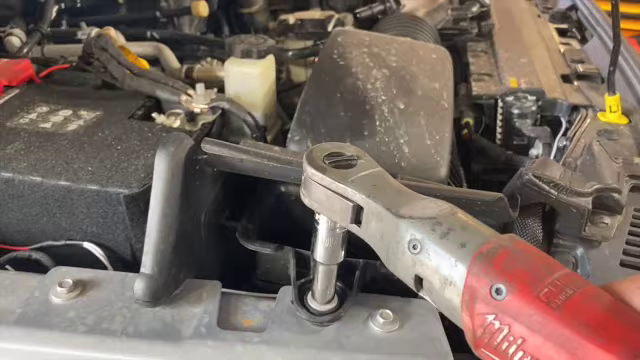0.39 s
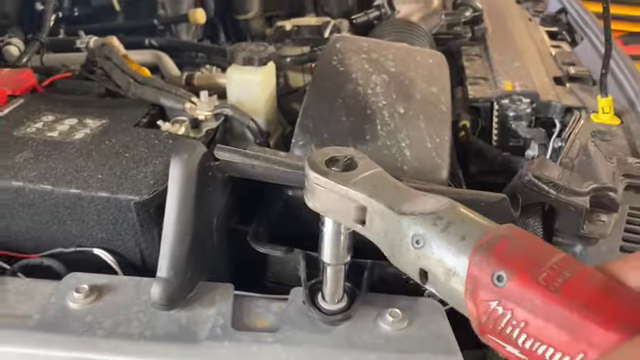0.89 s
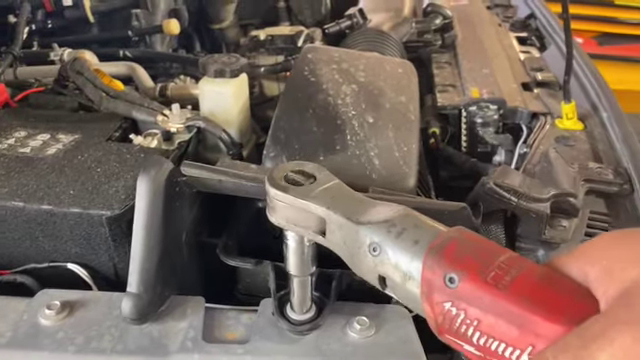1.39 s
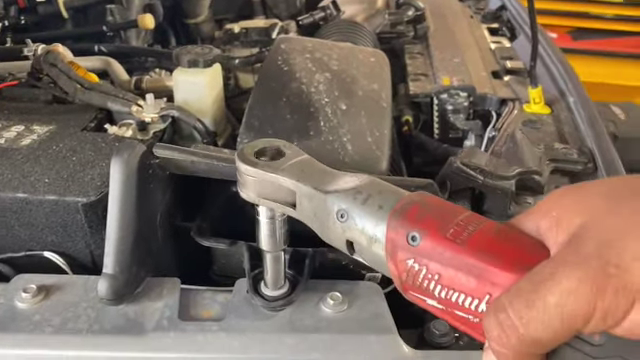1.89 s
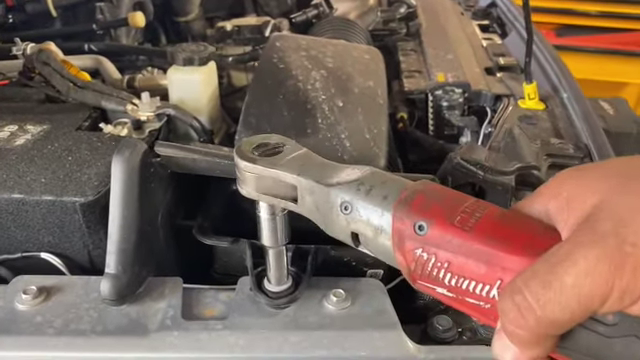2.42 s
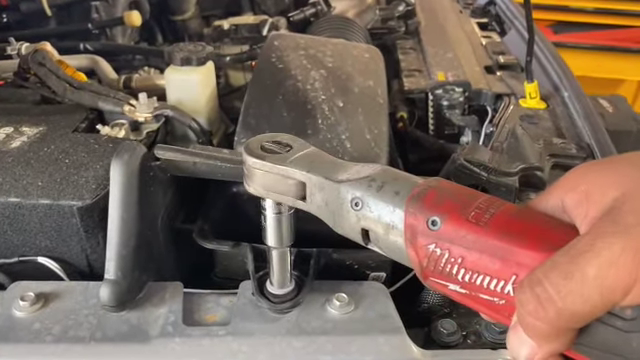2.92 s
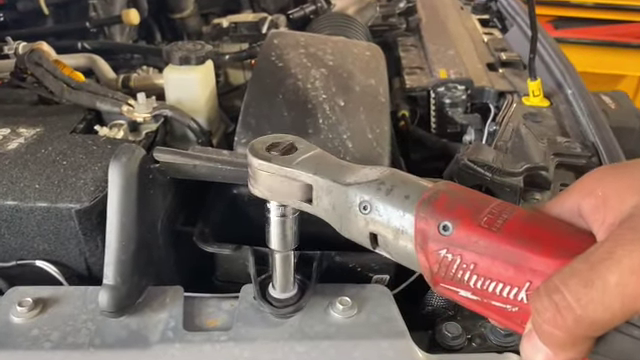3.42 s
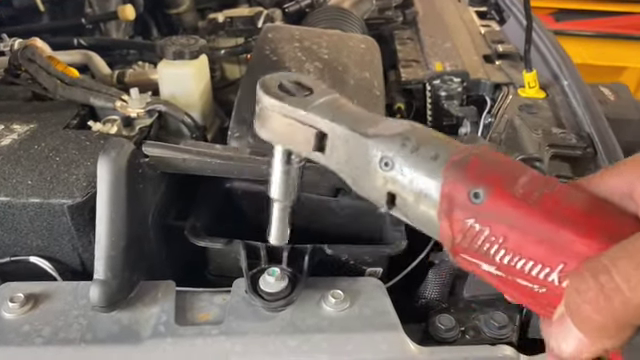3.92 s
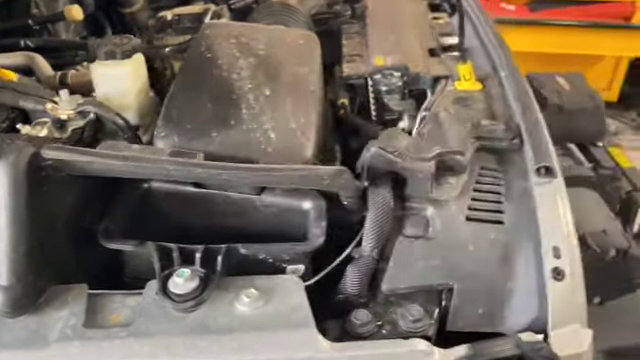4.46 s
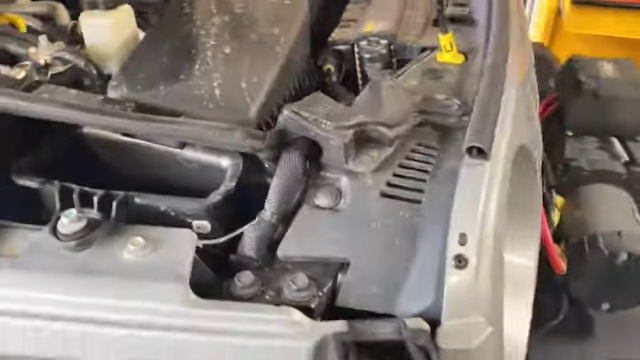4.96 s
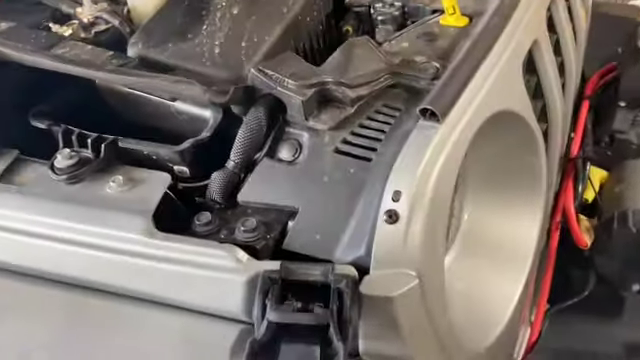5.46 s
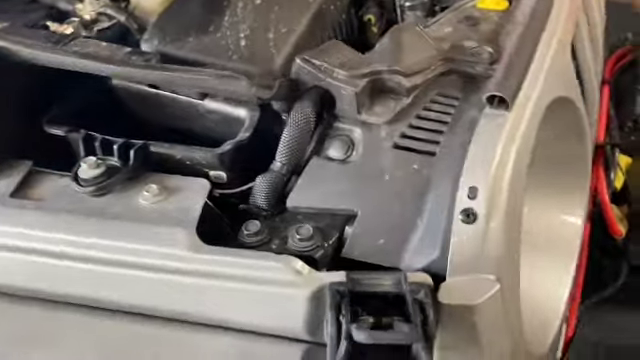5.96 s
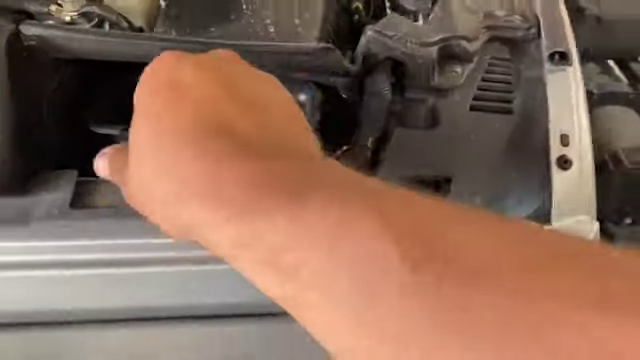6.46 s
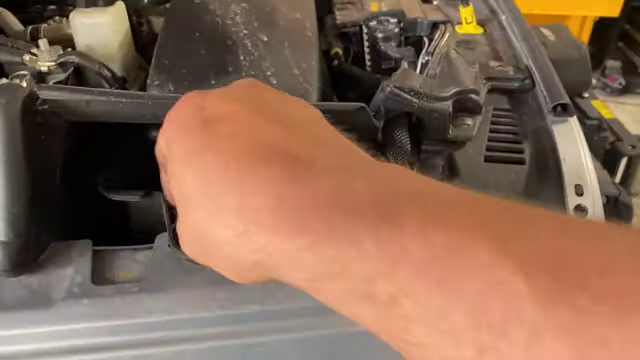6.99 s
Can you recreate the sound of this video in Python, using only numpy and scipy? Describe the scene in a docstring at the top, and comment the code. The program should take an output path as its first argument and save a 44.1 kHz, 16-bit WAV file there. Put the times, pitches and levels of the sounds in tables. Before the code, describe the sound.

A loud geared motor dominates the first four seconds, heard in stereo very near the microphone: fast metallic chatter, high steel snaps, thin whine and bolt knocks that soften as the thread loosens. After an abrupt stop, only soft shop air remains. A metal plate clanks and bounces in the reverberant shop; later a hand rustles and taps and a plastic part snaps.

```python
"""Small taps of hand and trigger open the scene in a workshop, close to a two-port microphone.
A cordless ratchet then backs a bolt out of an engine bay: a geared motor turns a crank, and every turn
rocks the yoke, snaps the pawl over its teeth and knocks the bolt, while gain control pulls the level down.
After the stop a metal plate clanks and rings in the shop; a hand rustles and taps, and a plastic part clicks.
Shop air hums throughout, filtered from noise; struck parts are sums of decaying modes."""
import sys
import numpy as np
from scipy import signal
from scipy.fft import rfft, irfft, next_fast_len
from scipy.io import wavfile
from scipy.ndimage import uniform_filter1d

SR = 44100
rng = np.random.default_rng(int(sys.argv[2]) if len(sys.argv) > 2 else 0)


def pcm_store(signal):
    """Save signal as 16-bit PCM."""
    levels = np.round(np.clip(np.atleast_2d(signal), -1, 1) * 32767)
    wavfile.write(sys.argv[1], SR, levels.astype(np.int16).T)


def natural_amplitude(level_db):
    """Convert a level in decibels to a linear amplitude factor, elementwise."""
    exponent = np.asarray(level_db, float) / 20
    return 10 ** exponent


N = 313452
T = np.arange(N) / SR
PADDED = next_fast_len(N)
HZ = np.fft.rfftfreq(PADDED, 1 / SR)

# Levels in the tables are relative: gains further on act on them.
# Spectrum of the shop air: [hz, level_db per Hz]
AIR_SPECTRUM = [(12, -43), (20, -11.5), (85, 1), (190, -11.5), (250, -3), (285, -12.5), (337, -10),
                (420, -17), (725, -23.5), (1200, -24.5), (1900, -32.5), (4000, -40.5), (14000, -65)]
# Strokes of hand and cloth: [middle_s, length_s, level_db]
RUSTLE_STROKES = [(.2, 1, -83), (5.08, .16, -75), (5.35, 0.46, -76), (5.6, 1, -76), (6.55, 0.28, -74),
                  (6.865, 0.091, -72), (6.925, 0.042, -78.5), (6.98, .05, -71), (7.0, 0.51, -74)]
# Spectrum of rubbed cloth: [hz, level_db per Hz]
CLOTH_SPECTRUM = [(400, -3.5), (900, 0), (1800, 1), (2800, 1), (4000, -7.5), (7500, -7), (11000, -14),
                  (14000, -21.5)]
# Small taps of hand, trigger and metal: [start_s, level_db, centre_hz, t60_s, shop_echo_db]
SMALL_TAPS = [(0.176, -52, 9250, 0.027, -1), (0.32, -55.5, 2790, 0.017, -10),
              (0.37, -49.5, 2670, 0.012, -5.5), (5.351, -56, 1300, 0.01, 14),
              (5.351, -47, 12800, 0.026, 13), (5.486, -44, 12000, .012, -3), (5.486, -43, 6240, 0.021, 1),
              (6.407, -57, 1620, 0.025, -3), (6.411, -64.5, 5000, .02, 0), (6.606, -58, 3490, 0.024, 8.5),
              (6.697, -58, 5800, 0.016, -3), (6.81, -56, 1200, 0.026, -2.5), (6.864, -62.5, 5030, .04, 4),
              (6.852, -57, 780, 0.047, -2), (6.869, -54, 600, 0.026, 6), (6.885, -65, 3400, 0.046, 3),
              (6.922, -51.5, 1500, 0.04, -4), (6.926, -50, 545, .04, -1), (6.958, -53, 1830, 0.058, -6),
              (6.9215, -56, 5200, 0.054, -7.5), (6.972, -48, 2200, 0.056, 5), (6.973, -47, 4320, 0.039, 2),
              (6.975, -50, 1110, .04, -2)]
# Modes of a small plastic part: [hz, width_hz, level_db]
PLASTIC_MODES = [(1620, 99, -15), (2280, 130, -4), (3660, 440, -1), (3900, 30, -12), (4000, 150, -12),
                 (4850, 370, -5.5), (5500, 460, -3.5), (7700, 2400, -6)]
# Hits on the plastic part: [start_s, level_db]
PLASTIC_HITS = [(6.7423, -39), (6.7437, -26.5), (6.7468, -31), (6.782, -58), (6.8112, -55), (6.818, -55)]
# Modes of a metal plate: [hz, width_hz, level_db]
PLATE_MODES = [(1534, 140, -23), (2790, 99, 3), (3200, 360, -6), (4320, 180, -8), (5950, 400, -10),
               (7100, 500, -1), (8000, 290, 11), (8340, 350, -6)]
# The plate lands and bounces: [start_s, level_db]
PLATE_LANDINGS = [(5.3525, -27.5), (5.364, -45), (5.372, -42), (5.385, -48), (5.4, -55), (5.428, -62)]
# Decay of the shop echo: [hz, t60_s]
SHOP_DECAY = [(500, .3), (1300, .45), (3500, .38), (9000, .35), (11000, .33), (14000, .2)]
# How well the tool's sound escapes the bay: [hz, level_db]
BAY_ESCAPE = [(500, -17.5), (3000, -16), (4800, -22), (6500, -13.5), (8700, -22.5), (10300, -17.5),
              (13500, -22)]

# Motor shaft: [time_s, speed_turns_per_s]
SHAFT_SPEED = [(.41, 120), (.44, 300), (.5, 345), (.56, 369), (.62, 380), (.76, 382), (1., 386),
               (1.3, 387.3), (1.9, 388.3), (2.5, 388.3), (3.1, 388), (3.76, 387.3), (3.8, 368), (3.85, 338),
               (3.9, 297), (3.94, 258)]
# Running tool: [time_s, drive_db against free running, bite_db of the thread as the bolt comes loose]
TOOL_LOAD = [(0.413, -20.5, -2.5), (0.426, -19.5, -11.5), (0.439, -2, 10), (0.545, -2.5, 11),
             (0.63, -3, 11.5), (0.739, -1.5, 10.5), (0.9, 0, 5), (1.1, -0.1, 7), (1.5, 0.27, 4),
             (1.85, 0.5, -0.5), (1.93, 0.36, 4), (2.4, 0.3, -5.5), (3., 0.3, -10.5), (3.3, 0.3, -10),
             (3.55, 0.17, -25), (3.8, -0.2, -30), (3.88, -5.5, -21), (3.94, -3.5, -15)]
# Contacts in one crank turn: [place_turns, decay_turns, rattle_db, pawl_db]
CRANK_CONTACTS = [(-.22, .2, -22, -5), (-.07, .08, -6, -6), (0, .03, -14, -8), (.22, .12, -3, -11),
                  (.45, .07, -4, -26)]
# The gripping hand rumbles: [middle_s, length_s, level_db]
HAND_RUMBLES = [(.5, 0.14, -33), (.7, 0.2, -44), (1.07, 0.24, -52.5), (1.74, 0.11, -56), (2.46, .14, -50.5),
                (2.7, 0.25, -50), (2.89, 0.18, -43), (3.12, 0.41, -41), (3.41, 0.46, -33.5),
                (3.68, 0.33, -41)]
# Chirps of the motor at grip and stall: [start_s, level_db, first_hz, last_hz, length_s, shape_exponent]
MOTOR_CHIRPS = [(.4115, -26, 4090, 4030, .008, .5), (3.9165, -35, 1090, 520, .02, .85)]
# Tonal lines of the motor: [multiple_of_shaft_speed, level_db]
SHAFT_ORDERS = [(1, 0), (2, -9), (4, -0.5), (5, -15), (6, -11), (8, -2), (10, -17.5), (12, -2), (13, 1),
                (16, -8.5)]
# Sway of the yoke: [multiple_of_crank_speed, level_db]
YOKE_ORDERS = [(1, -8), (2, -2), (3, -6.5), (4, -4), (5, -0.5), (6, 1), (9, 0), (10, 1.5), (11, 2),
               (13, 4.5), (14, 0)]
# Gears heard through the housing: [hz, level_db per Hz]
GEAR_SPECTRUM = [(120, -30), (500, -16), (1000, -12), (1300, -16), (1560, -6), (1900, -8.5), (2400, -4),
                 (3000, -3.5), (3700, -5.5), (4300, -4.5), (5200, -3), (5700, -5.5), (6300, -4),
                 (7200, -0.5), (8600, 1.5), (12000, -3), (14300, -13), (15300, -6)]
# Gear-case resonance as the tool tilts: [time_s, centre_hz]
CASE_GLIDE = [(.4, 4500), (.8, 5000), (1.3, 5200), (2.6, 5250), (3.9, 5180)]
# Second gear-case resonance, one row: [centre_hz, width_hz, share]
CASE_FIXED = (4300, 370, 0.75)
# Hard knocks as the tight bolt breaks free: [start_s, level_db]
BREAKING_BLOWS = [(0.44, -20), (0.475, -13.5), (0.496, -5.5), (.516, -16), (0.537, -11.5), (.547, -12),
                  (0.556, -12), (.577, -16.5), (.595, -12.5), (.613, -16), (.633, -10.5), (.651, -15.5),
                  (.67, -14.5), (.689, -15), (.709, -14.5), (.727, -15), (.746, -23), (.764, -7),
                  (.784, -18.5), (.82, -22), (.839, -24)]
# The knock shifts as the load changes: [time_s, place_turns of the crank]
KNOCK_PLACE = [(.75, 0.35), (1., 0.13), (1.8, 0.16), (2., 0.27), (3.9, 0.24)]
# Modes of the bracket round the bolt: [hz, width_hz, level_db]
BRACKET_MODES = [(203, 35, -12), (726, 24, -4), (928, 110, 2), (1007, 240, 2), (1393, 130, 1.5),
                 (1460, 63, -0.5), (2034, 110, -1), (2300, 50, 0), (2680, 100, 3.5)]
# Modes of a wide panel: [hz, width_hz, level_db]
PANEL_MODES = [(102, 76, -11.5), (193.4, 57, -3.5), (275, 19, -14.5), (319.7, 46, -1), (466, 240, 9),
               (642, 100, 7)]
# Modes of the bolt: [hz, width_hz, level_db]
BOLT_MODES = [(992.3, 60, 1.5), (1019, 120, -0.5)]
# The loose bolt jangles in its bracket: [middle_s, length_s, level_db]
BOLT_JANGLES = [(.54, 0.11, -33.5), (.68, 0.2, -45.5), (.96, 0.098, -39), (1.1, 0.21, -44.5),
                (1.37, 0.54, -53.5), (1.62, 0.41, -52), (1.78, .1, -52), (1.93, 0.19, -39.5),
                (2.03, 0.32, -44.5), (2.23, 0.12, -38), (2.33, 0.14, -39.5), (2.47, 0.18, -53.5),
                (2.62, 0.12, -42), (3.05, 0.11, -45), (3.8, 0.31, -77)]
# Modes of the steel head: [hz, width_hz, level_db]
HEAD_MODES = [(10170, 470, 15), (10100, 600, -10), (10400, 860, -5), (15200, 900, -3)]
# Hard pawl snaps: [start_s, level_db]
HARD_SNAPS = [(0.4633, -25.5), (0.5281, -30), (0.643, -19), (0.7421, -17.5), (1.1986, -19), (1.3058, -17),
              (1.5298, -17.5), (1.6925, -25), (1.7857, -19), (1.8212, -11), (1.897, -13.5), (2.0262, -17),
              (2.316, -16), (2.3739, -8), (3.1232, -14), (3.2335, -20.5), (3.8298, -13), (3.875, -17),
              (3.8975, -17.5), (3.929, -15.5)]

# Microphone ports: [hz, likeness 0-1, right_lead_rad, left_over_right_db for a near source]
PORT_PAIR = [(60, .94, 0, -1), (300, .93, .2, -2), (700, .8, .3, -4), (1150, .55, .3, 0), (1300, .1, .3, 0),
             (1500, .5, .3, 0), (1800, .5, .3, 0), (2300, .65, 2.8, -2), (2500, .8, 3.1, -2),
             (2700, .5, 3, -2), (3200, .1, .3, -2), (4300, .6, .2, -4), (5500, .55, 1.1, -5),
             (6800, .55, -.1, -2), (7700, .7, -1.3, -1), (8250, .995, -3.05, 0), (9000, .998, -3.2, 0),
             (9300, .8, -3.9, 0), (9900, .85, -4.8, 0), (10800, .95, -6.2, 0), (11800, .95, -6.4, 0),
             (12800, .995, -9.3, 0), (14400, .995, -9.5, 0), (14900, .9, -12.4, 0)]
# Edges of the microphone chain, one row: [low_hz, high_hz]
CHAIN_EDGES = (40, 15700)
# Greatest likeness at the ports, per frequency bin, of sound from all round
DIFFUSE = np.interp(HZ, [1500, 2200, 2800, 3500, 7500, 8300], [1, .1, .1, .8, .8, .55])

GEAR = 7.123  # motor turns per crank turn
PAWL_AT_S = 2.3755  # a moment when the main pawl snap falls
STOP_S = 3.932  # the brake catches


def evened(x):
    """Normalisation: scales to rms 1."""
    return x / np.sqrt(np.mean(x ** 2) + 1e-20)


def read(points, hz, axis=1):
    """Interpolation: one column of a table over log frequency."""
    table = np.array(points)
    return np.interp(np.log(hz + 1), np.log(table[:, 0] + 1), table[:, axis])


def filtered(x, response):
    """Linear filtering: multiplies the spectrum by a response."""
    return irfft(rfft(x, PADDED) * response, PADDED)[..., :N]


def coloured(x, points):
    """Spectral shaping: filters by a tabled spectrum and scales to rms 1."""
    return evened(filtered(x, natural_amplitude(read(points, HZ))))


def noise():
    """Incoherence: two unrelated noises, later blended for the two ports."""
    return rng.standard_normal((2, N))


def slow_drift(size):
    """Random fluctuation: noise averaged over size samples, at rms 1."""
    return evened(uniform_filter1d(rng.standard_normal(N), size))


def grains(per_s, spread_db, t60):
    """Shot noise: random contacts of uneven size that die exponentially."""
    height = natural_amplitude(spread_db * np.minimum(rng.exponential(1, N), 4))
    height = height * (rng.random(N) < per_s / SR)
    return signal.lfilter([1], [1, -np.exp(-np.log(1000) / (max(t60, 1e-4) * SR))], height)


def swells(rows, rest_db):
    """Amplitude envelope: half-cosine swells over a resting level."""
    out = np.full(N, natural_amplitude(rest_db))
    for s, length, db in rows:
        at = slice(max(round((s - length / 2) * SR), 0), round((s + length / 2) * SR))
        out[at] += natural_amplitude(db) * np.cos(np.pi * (T[at] - s) / length)
    return out


def struck(rows, decay_s):
    """Impulsive excitation: jumps at each listed hit and decays exponentially."""
    out = np.zeros(N)
    for s, db in rows:
        out[round(s * SR)] = natural_amplitude(db)
    return signal.lfilter([1], [1, -np.exp(-1 / (decay_s * SR))], out)


def ring(x, modes):
    """Modal synthesis: a force drives decaying modes; neighbours swing in opposite directions."""
    t = np.arange(3000) / SR
    body = np.zeros(3000)
    for k, (hz, width, db) in enumerate(modes):
        decay = np.exp(-np.pi * width * t)
        body += (-1) ** k * natural_amplitude(db) * np.sqrt(width) * decay * np.sin(2 * np.pi * hz * t)
    return signal.oaconvolve(x, body[None], axes=1)[:, :N]


def resonate(x, hz, width):
    """Moving resonance: shifts the curve hz to zero, smooths, shifts back."""
    turn = np.exp(2j * np.pi * np.cumsum(hz) / SR)
    r = np.exp(-np.pi * width / SR)
    return 2 * (turn * signal.lfilter([1 - r], [1, -r], x / turn)).real


def shop_air():
    """Stationary noise: coloured hum of the room with a slow swell."""
    return natural_amplitude(-59.5) * natural_amplitude(0.3 * slow_drift(5000)) * coloured(noise(), AIR_SPECTRUM)


def rustle():
    """Friction: many small random contacts of hand and cloth modulate coloured noise."""
    rub = swells(RUSTLE_STROKES, rest_db=-81)
    return rub * coloured((1.5 + grains(400, 2.7, 0.012)) * noise(), CLOTH_SPECTRUM)


def taps():
    """Impact: each tap is a dying burst of broad-band noise; gives direct sound and the part sent to the shop."""
    direct, sent, t = np.zeros(N), np.zeros(N), np.arange(4000) / SR
    f = np.fft.rfftfreq(4000, 1 / SR)
    for s, db, hz, t60, echo_db in SMALL_TAPS:
        no_bass = f ** 4 / (f ** 4 + (0.38 * hz) ** 4)  # small parts give no bass
        off_centre = (f - hz) / (0.79 * hz)
        band = no_bass / (1 + 4 * off_centre ** 2) / (1 + (f / (1.6 * hz)) ** 4)
        tap = irfft(rfft(rng.standard_normal(4000)) * band) * natural_amplitude(-60 * t / t60)
        tap *= natural_amplitude(db) / abs(tap).max()
        at = slice(round(s * SR), round(s * SR) + 4000)
        direct[at] += tap
        sent[at] += natural_amplitude(echo_db) * tap * natural_amplitude(-60 * t / 0.011)  # mostly the first crack carries
    return direct, sent


def small_part(hits, modes):
    """Modal response: one small part rings with its own modes at every hit."""
    push = struck(hits, .00005)[None] * (1 + 0.17 * rng.standard_normal(N))
    return ring(push, modes)[0] / abs(ring(np.ones((1, 2)), modes)).max()


def plastic_and_plate():
    """Impact and ringing of a plastic part and a metal plate; gives direct sound and the part sent to the shop."""
    plastic = small_part(PLASTIC_HITS, PLASTIC_MODES)
    plate = small_part(PLATE_LANDINGS, PLATE_MODES)
    slap = struck(PLATE_LANDINGS, .00002)
    slap = slap - uniform_filter1d(slap, size=50)  # the bare slap has no bass
    return plastic + plate, natural_amplitude(-9.) * plate + natural_amplitude(-23.0) * plastic + natural_amplitude(9.5) * slap


def shop(x):
    """Reverberation: a dense echo tail, each band dying at its own speed."""
    hz, t, z = signal.stft(rng.standard_normal((2, SR)), SR, nperseg=256)
    decay = natural_amplitude(-60 * t / read(SHOP_DECAY, hz)[:, None])
    tail = signal.istft(z * decay, SR, nperseg=256)[1]
    return signal.fftconvolve(x[None], tail / np.linalg.norm(tail[0]), axes=1)[:, :N]


def follow(db, drive, bite):
    """Load dependence: each part of the tool takes its own share of drive and bite."""
    s, drive_db, bite_db = np.transpose(TOOL_LOAD)
    return natural_amplitude(np.interp(T, s, db + drive * drive_db + bite * bite_db, -150, -150))


def contacts(crank, axis, spread_db, rest):
    """Periodic contact force over the crank turns; every contact lands with its own strength."""
    out = np.full(N, rest)
    for row in CRANK_CONTACTS:
        turn = crank - row[0] + .5
        luck = np.clip(rng.standard_normal((300, 2)), -1.7, 1.7)[np.floor(turn).astype(int) % 300]
        late = 0.02 * luck[:, 0]  # turns
        since = np.maximum(turn % 1 - .5 - late, -1e-3) / row[1]
        out += natural_amplitude(row[axis] + spread_db * luck[:, 1]) * (since >= 0) * np.exp(-since)
    return out


def hand_rumble():
    """Low-frequency vibration: grainy bass noise in the gripping hand."""
    spectrum = [(25, -16.5), (50, -0.5), (105, -1.5), (210, -9.0), (400, -14.0)]  # hz, level_db
    grip = follow(0., drive=.4, bite=0.) * swells(HAND_RUMBLES, -62.0)
    return grip * coloured((1 + grains(30, 4.0, .1)) * noise(), spectrum)


def motor_chirps():
    """Frequency glide: short tones sweep linearly as the motor grips and stalls."""
    out = np.zeros(N)
    for s, db, first_hz, last_hz, length, shape in MOTOR_CHIRPS:
        u = np.clip((T - s) / length, 0, 1)
        cycles = length * (first_hz * u + (last_hz - first_hz) * u ** 2 / 2)
        out += natural_amplitude(db) * np.sin(np.pi * u ** shape) * np.sin(2 * np.pi * cycles)
    return out


def harmonics(turns, orders):
    """Order synthesis: sines at multiples of a rotation, each wavering in level."""
    out = np.zeros(N)
    for k, db in orders:
        waver = 1 + .22 * slow_drift(1500)
        out += natural_amplitude(db) * waver * np.sin(2 * np.pi * (k * turns + rng.random()))
    return out


def yoke_sway(crank):
    """Forced vibration: the rocking yoke sounds at multiples of the crank speed."""
    return follow(-54.5, drive=0.25, bite=0.42) * harmonics(crank, YOKE_ORDERS)


def shaft_whine(shaft):
    """Rotational tones: lines at multiples of the shaft speed, blurred by uneven turning."""
    wobble = .015 * slow_drift(900)  # turns
    clarity = natural_amplitude(np.interp(T, [.5, .72, 3.77, 3.8], [-8.0, -0.5, -0.5, -3.0]))  # clearest at full speed
    gain = np.sqrt(2) * follow(-44.0, drive=2.7, bite=0.023) * clarity
    return gain * harmonics(shaft + wobble, SHAFT_ORDERS)


def gear_rattle(crank):
    """Source and filter: gear contacts modulate noise, which the case resonances colour."""
    gears = contacts(crank, axis=2, spread_db=1.5, rest=.6)
    gears = gears * (2.0 + grains(900, 0.92, 0.003))
    gears = gears + 12.0 * struck(BREAKING_BLOWS, 0.002)  # hard knocks also jolt the gears
    teeth = coloured(gears * noise(), GEAR_SPECTRUM)
    moving = resonate(teeth, np.interp(T, *np.transpose(CASE_GLIDE)), 500)
    hz, width_hz, share = CASE_FIXED
    fixed = share * resonate(teeth, np.full(N, hz), width_hz)
    return follow(-27.0, drive=0.84, bite=0.) * (1.39 * teeth + moving + fixed)


def bolt_knocks(crank):
    """Coupled impact: each crank turn drives the modes of bracket, wide panel and bolt."""
    turn = crank - np.interp(T, *np.transpose(KNOCK_PLACE))
    strength = natural_amplitude(1.3 * rng.standard_normal(300))[np.floor(turn).astype(int) % 300]
    strands = np.array([[1], [.4]])
    # the same push each turn gives lines at the crank rate
    blow = strength * np.exp(-(turn % 1) / 0.00058) * strands
    # loose parts rattle after each blow
    looseness = strength * np.exp(-(turn % 1) / .2) + .25 + .3 * grains(160, 1.5, .015)
    chatter = .07 * looseness * noise()
    bracket = follow(-41.5, drive=0.17, bite=1.0) * evened(ring(blow + chatter, BRACKET_MODES))
    panel = follow(-47.0, drive=3.4, bite=0.65) * evened(ring(blow + .5 * chatter, PANEL_MODES))
    jangle = follow(0., drive=.4, bite=0.) * swells(BOLT_JANGLES, -58.5)
    jangle = jangle * evened(ring(blow + 1.2 * chatter, BOLT_MODES))
    hard = 0.398 * struck(BREAKING_BLOWS, 0.0012) * noise()
    hard = hard + 3.1 * struck(BREAKING_BLOWS, .0001) * strands
    return bracket + panel + jangle + natural_amplitude(-54.5) * ring(hard, BRACKET_MODES)


def pawl_snaps(crank):
    """Modal excitation: the pawl's contact force, as noise, rings the steel head."""
    snap = evened(contacts(crank, axis=3, spread_db=2.5, rest=.2))
    engaged = natural_amplitude(np.interp(T, [.44, .56], [-6., 0]))  # the pawl comes up to speed
    force = engaged * follow(-28.5, drive=1.7, bite=-0.062) * snap
    force = force + uniform_filter1d(struck(HARD_SNAPS, 0.0029), size=90)  # the pawl lands over 2 ms
    hiss = noise()
    return ring(force * hiss, HEAD_MODES) / np.std(ring(hiss, HEAD_MODES))


def ratchet():
    """Kinematic coupling: rattle, snaps, knocks, sway and whine are all locked to the motor's rotation."""
    shaft = np.cumsum(np.interp(T, *np.transpose(SHAFT_SPEED))) / SR
    crank = (shaft - shaft[int(PAWL_AT_S * SR)]) / GEAR
    out = gear_rattle(crank) + pawl_snaps(crank) + bolt_knocks(crank) + hand_rumble()
    out = out * np.exp(-np.maximum(T - STOP_S, 0) / .003)
    out[0] += shaft_whine(shaft) + yoke_sway(crank) + motor_chirps()
    return out


def ports(strands, near, most_alike):
    """Interaural-style coherence: two ports blend the strands; near sets how far a source leans to one side."""
    a, b = rfft(strands, PADDED)
    like = np.minimum(read(PORT_PAIR, HZ), most_alike)
    lead = read(PORT_PAIR, HZ, axis=2)
    tilt = natural_amplitude(near * read(PORT_PAIR, HZ, axis=3) / 2)
    shared, apart = np.sqrt((1 + like) / 2) * a, np.sqrt((1 - like) / 2) * b
    left = (shared + apart) * tilt * np.exp(-.5j * lead)
    right = (shared - apart) / tilt * np.exp(.5j * lead)
    return irfft([left, right], PADDED)[:, :N]


def scene():
    """Superposition: each source is two strands of one sound field, heard at the two ports."""
    tool = ratchet()
    tap, tap_sent = taps()
    part, part_sent = plastic_and_plate()
    escaped = filtered(tool[0], natural_amplitude(read(BAY_ESCAPE, HZ)))
    around = shop(escaped + tap_sent + part_sent) + shop_air() + rustle()
    around[0] += tap + part
    return ports(tool, near=1, most_alike=1) + ports(around, near=0.35, most_alike=DIFFUSE)


def band_limit(x):
    """A steep low-pass at the top of the band."""
    return signal.sosfilt(signal.butter(12, 17110, fs=SR, output="sos"), x)


def record(dry):
    """Band limiting, gain control that sinks under loud sound and creeps back, and saturation of peaks."""
    low_hz, high_hz = CHAIN_EDGES
    x = filtered(dry, 1 / np.sqrt(1 + (low_hz / (HZ + 1)) ** 6))
    loud = uniform_filter1d((x ** 2).mean(0), 441)[::441] > natural_amplitude(-40.) ** 2
    boost_db, full_db = [], 13.
    now_db = full_db
    for over in loud:  # steps of 10 ms
        now_db += -.045 * now_db if over else min(.006, full_db - now_db)
        boost_db.append(now_db)
    x = x * natural_amplitude(np.interp(T, np.arange(len(loud)) * 441 / SR, boost_db))
    x = x / (1 + (x / .95) ** 4) ** .25  # saturates towards .95
    x = filtered(x, 1 / np.sqrt(1 + (HZ / high_hz) ** 400))
    return band_limit(x)


dry = scene()
out = record(dry)
pcm_store(out)
```